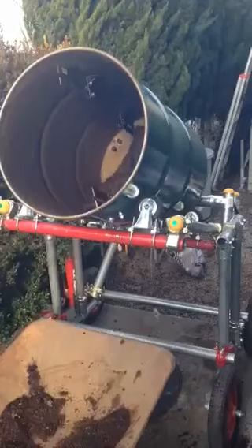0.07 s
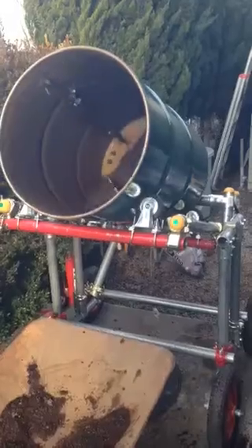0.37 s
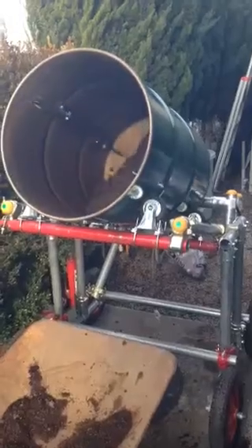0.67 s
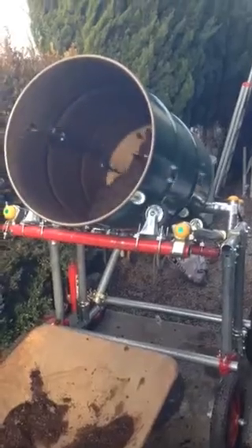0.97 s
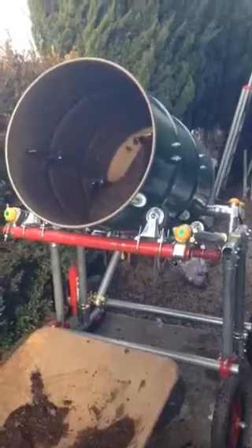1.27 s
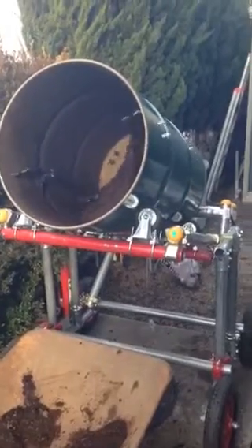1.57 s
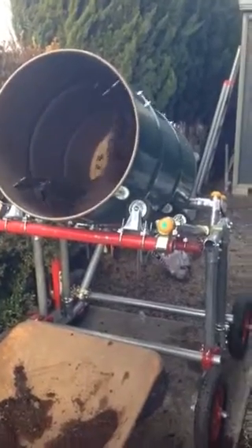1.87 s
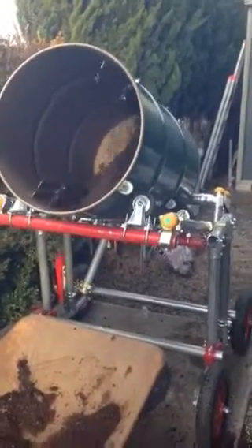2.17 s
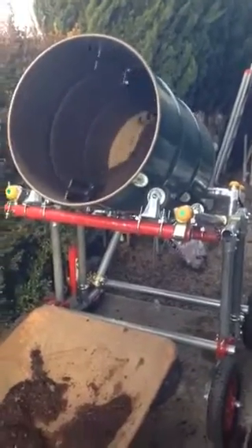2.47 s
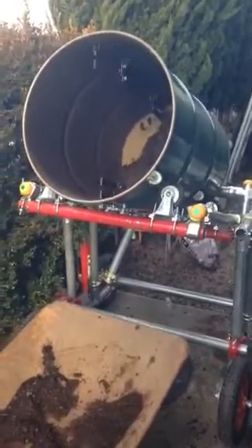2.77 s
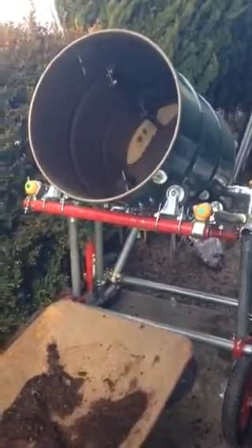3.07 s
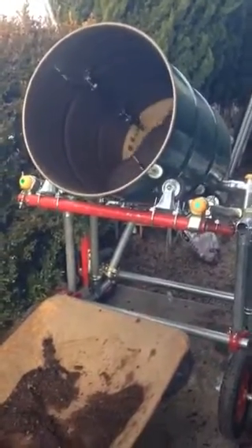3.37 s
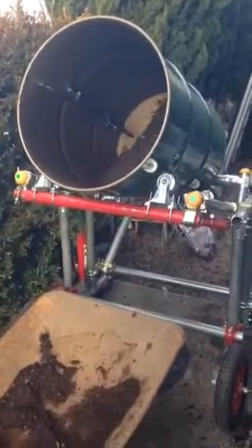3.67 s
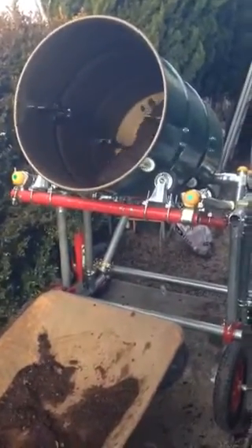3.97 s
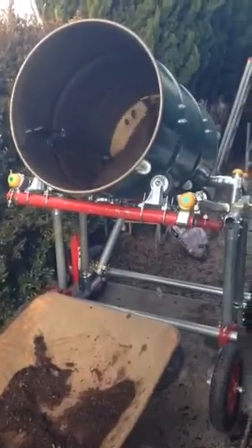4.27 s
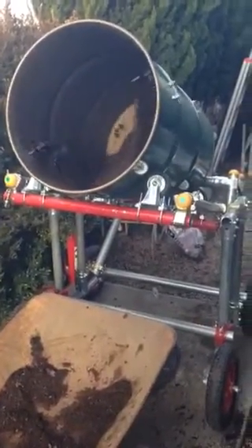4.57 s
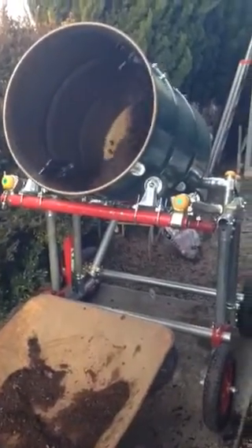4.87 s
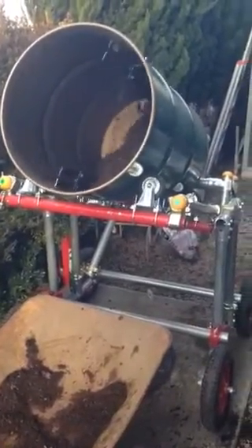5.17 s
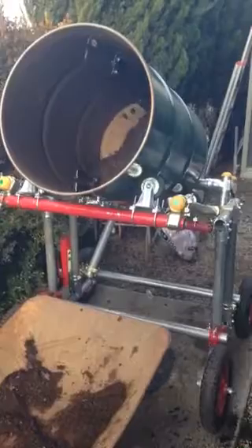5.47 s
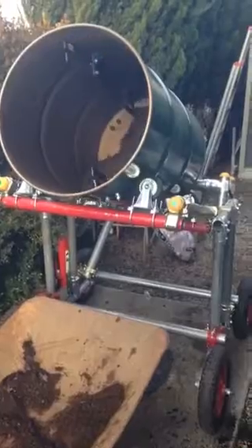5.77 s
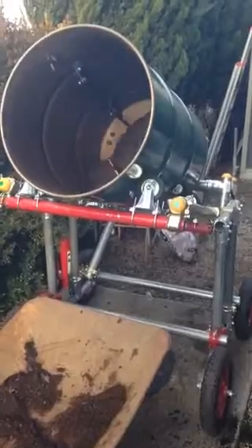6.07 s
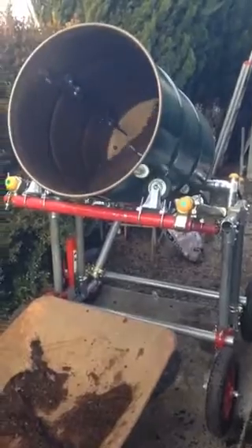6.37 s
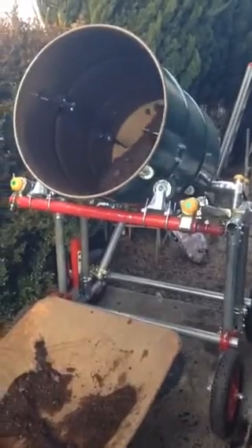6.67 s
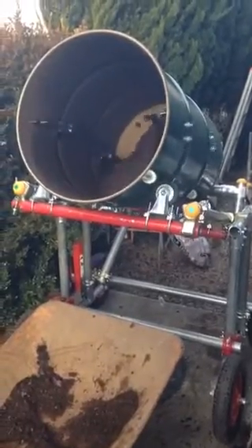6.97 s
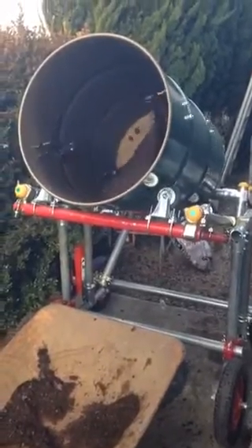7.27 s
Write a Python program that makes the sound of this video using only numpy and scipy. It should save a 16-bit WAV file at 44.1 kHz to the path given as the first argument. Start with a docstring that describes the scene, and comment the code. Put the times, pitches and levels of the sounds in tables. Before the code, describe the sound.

Compost trickles and spills inside a turning steel drum, with small stones clacking over a humming motor and a fast-knocking drive.

```python
"""Compost tumbling in a steel drum

A home-made mixer turns a drum on rollers, outdoors and close by. The rollers rumble, the motor hums,
and the drive knocks about 21 times a second, exciting the damped modes of the frame. Inside, compost
trickles, slides and spills from the paddles: countless tiny impacts, coloured by the steel's resonances.
Soft clods thud, stones clack and grit squeaks, all with the short reverberation of the drum."""
import sys
import numpy as np
from scipy import signal
from scipy.fft import rfft, irfft
from scipy.io import wavfile

SR = 44100
rng = np.random.default_rng(int(sys.argv[2]) if len(sys.argv) > 2 else 0)


def inscribe(sig):
    """Save sig as 16-bit PCM at rate SR to the path in sys.argv[1].

    A 1-D sig is mono; a 2-D sig holds one channel per row.
    Samples are clipped to [-1, 1] before scaling.
    """
    pcm = np.round(np.clip(np.atleast_2d(sig).T, -1, 1) * 32767)
    wavfile.write(sys.argv[1], SR, pcm.astype(np.int16))


N = 331632
TIME = np.arange(N) / SR

# resonances of the steel drum: (frequency [Hz], bandwidth [Hz], boost [dB])
STEEL_RESONANCES = [(627, 63, 2.5), (1960, 28, 6), (2190, 51, 3.5), (2500, 80, 5), (2930, 230, 3.5),
                    (3342, 56, 8), (3840, 190, 4), (4345, 130, 4.5), (6800, 90, 2), (8600, 80, -1)]
# impact spectra of crumbs and of fine dust: (frequency [Hz], relative level [dB])
CRUMB_SPECTRUM = [(150, -38), (450, -10), (800, -7.5), (1200, -12), (1700, -3), (2400, -0.5), (3100, 0.5),
                  (4000, -4), (5500, -9), (8000, -19.5), (15000, -45)]
DUST_SPECTRUM = [(1000, -21.5), (3000, -28.5), (4500, -3), (6000, -.5), (7200, 0.5), (9000, -3.5),
                 (10500, -9.5), (12500, -18.5), (15000, -23)]


def amp(db):
    """Amplitude ratio of a level in decibels."""
    return 10 ** (np.asarray(db) / 20)


def unit_rms(x):
    """Normalisation to an rms of 1."""
    return x / np.sqrt(np.mean(x ** 2) + 1e-20)


def follow(rows):
    """Linear interpolation of (time [s], value) rows at every sample."""
    return np.interp(TIME, *np.transpose(rows))


def add(mix, start, sound):
    """Superposition: a sound joins the mix at start [s]."""
    part = mix[max(round(start * SR), 0):][:len(sound)]
    part += sound[:len(part)]


def wander(hz):
    """Low-pass Gaussian noise: a fluctuation of rms 1 at rates up to about hz."""
    freqs = np.fft.rfftfreq(N, 1 / SR)
    return unit_rms(irfft(rfft(rng.standard_normal(N)) * np.exp(-(freqs / hz) ** 2), N))


def colour(x, spectrum, peaks=(), size=8192):
    """Minimum-phase filtering at unit energy: a smooth spectrum with resonance peaks on top."""
    hz = abs(np.fft.fftfreq(size, 1 / SR))
    knot_hz, knot_db = np.transpose(spectrum)
    db = np.interp(np.log(hz + 1), np.log(knot_hz), knot_db)
    for centre, width, boost in peaks:
        db = db + boost / (1 + (2 * (hz - centre) / width) ** 2)
    response = np.exp(np.conj(signal.hilbert(np.log(amp(db)))))
    taps = np.fft.ifft(response).real[:size // 2]
    return signal.oaconvolve(x, taps / np.linalg.norm(taps))[:len(x)]


def grains(per_s, spread_db, count):
    """Shot noise of rms 1: impacts at random moments, many small and a few large."""
    chance, quantile, sign = rng.random((3, count))
    size = np.minimum(-np.log(1 - quantile), 4)
    return unit_rms((chance < per_s / SR) * amp(spread_db * size) * np.sign(sign - .5))


def decay(t, rise, t60):
    """Exponential damping: a quick rise, then a fall of 60 dB per t60 [s]."""
    return (1 - np.exp(-t / rise)) * np.exp(-np.log(1000) * t / t60)


def ringing(modes, rise):
    """Free vibration after a blow: each mode is a damped sine."""
    t = TIME[:SR // 3]
    return sum(amp(db) * decay(t, rise, t60) * np.sin(2 * np.pi * hz * t) for hz, db, t60 in modes)


def drum_reverberation(x, t60, wet_db, count=300):
    """Diffuse reflection: grains land at ever new spots, so each short piece has its own echoes."""
    t, hop = TIME[:SR // 10], N // count + 1
    padded = np.pad(x, (hop, 2 * hop))
    pieces = np.lib.stride_tricks.sliding_window_view(padded, 2 * hop)[::hop]
    pieces = pieces * signal.windows.cosine(2 * hop)
    taps = rng.standard_normal((len(pieces), len(t))) * amp(-60 * t / t60)
    taps /= np.linalg.norm(taps, axis=1, keepdims=True)
    echo = np.zeros(len(padded))
    for k, piece in enumerate(signal.fftconvolve(pieces, taps, axes=1)):
        add(echo, k * hop / SR, piece)
    return (x + amp(wet_db) * echo[hop:hop + N]) / np.hypot(1, amp(wet_db))


def rollers():
    """Rolling noise: the drum rumbles over the broadband running of wheels and bearings."""
    # strength of the rumble: (time [s], relative level [dB])
    rumble_levels = [(0.2, -62.1), (0.55, -60.5), (1.1, -63.1), (1.35, -59.5), (1.7, -63.0), (2.15, -62.5),
                     (2.9, -61.5), (3.6, -64), (3.9, -61.5), (4.38, -59), (5.0, -65), (5.45, -65),
                     (6.2, -66.5), (6.6, -65), (7.3, -66)]
    # spectra of the rolling drum and of the bearings: (frequency [Hz], relative level [dB])
    rumble_spectrum = [(15, -39), (28, -14), (45, -9.5), (59, 6), (68, -7), (77, 1.5), (105, -13.5),
                       (200, -13.5), (600, -71)]
    running_spectrum = [(30, -9), (110, 3.5), (160, -15), (200, 9), (290, 6.5), (360, -4.5), (550, -1.5),
                        (1100, -3), (2800, -9), (5000, -12), (9000, -16.5), (15000, -20.5)]
    rumble = colour(rng.standard_normal(N), rumble_spectrum) * amp(follow(rumble_levels) + 1.5)
    running = rng.standard_normal(N) * amp(1.76 * wander(hz=24.7))
    return rumble + amp(-56) * colour(running, running_spectrum, STEEL_RESONANCES)


def motor():
    """Phase-modulated tones: magnetic hum and thin gear whine, over the drone of the drive."""
    # hum and whine: (frequency [Hz], rms level [dB], rms phase waver [cycles])
    partials = [(100.4, -65, .015), (150.1, -107, .03), (608, -77, 0.026), (1610, -76, 0.32),
                (3235, -74, 0.54)]
    # the drone grows as the paddles lift the load: (time [s], rms level [dB])
    drone_levels = [(0, -69), (2.4, -80), (3.5, -69), (4.3, -63), (4.9, -60), (5.4, -60.5), (6, -64),
                    (7.5, -77)]
    tones, drone_hz = np.zeros(N), 90.2
    for hz, db, waver in partials:
        gain = amp(db + 2 * wander(hz=1))
        tones += gain * np.sin(2 * np.pi * (hz * TIME + waver * wander(hz=1.55)))
    drone = np.sin(2 * np.pi * (drone_hz * TIME + 0.076 * wander(hz=5.6)))
    return np.sqrt(2) * (tones + amp(follow(drone_levels)) * drone)


def drive():
    """Impulse-train excitation: the drive knocks the frame, every second knock harder on average."""
    # speed of the drive: (time [s], knock rate [1/s])
    knock_rates = [(0, 20.7), (2, 20.85), (3.2, 20.85), (4.3, 21.08), (5.5, 20.9), (6.3, 20.79),
                   (7.5, 20.82)]
    # strength of the knocks: (time [s], relative level [dB])
    knock_levels = [(0.25, -58), (0.75, -59.5), (1.0, -55), (1.65, -60.5), (2.15, -58.5), (2.6, -55.2),
                    (3.2, -59), (4.05, -57.5), (4.33, -53), (4.5, -63), (4.7, -53.5), (4.92, -57.8),
                    (5.3, -54.4), (6.2, -55), (7.35, -59.6)]
    # modes of the frame: (frequency [Hz], relative level [dB], t60 [s])
    frame_modes = [(87, -23, 0.11), (217, -18, 0.19), (234.8, 13, 0.098), (280, -4.5, 0.035)]
    jitter_s, scatter_db, limp_db = 0.00035, 2.74, 3
    knock_count = np.cumsum(follow(knock_rates)) / SR - .24
    times = TIME[1:][np.diff(np.floor(knock_count)) > 0]
    blows = np.zeros(N)
    for k, start in enumerate(times):
        late, force = rng.standard_normal(2)
        add(blows, start + jitter_s * late, [amp(scatter_db * force + limp_db * (k % 2 - .5))])
    knocks = signal.oaconvolve(blows, ringing(frame_modes, rise=0.0052))[:N]
    return unit_rms(knocks) * amp(follow(knock_levels) - 1)


def squeaks():
    """Friction tones: grit dragged over the steel sings briefly with a raspy, unsteady pitch."""
    # squeaks of grit: (time [s], duration [s], start pitch [Hz], end pitch [Hz], level [dB])
    glides = [(3.925, 0.05, 4550, 4380, -54), (3.958, 0.053, 1845, 1740, -54),
              (4.195, 0.14, 2940, 2950, -50.5), (5.472, 0.044, 6340, 6000, -49.5),
              (5.549, 0.047, 6250, 5330, -48)]
    out, tremble = np.zeros(N), .05 * wander(hz=900)
    for start, length, from_hz, to_hz, db in glides:
        count = round(length * SR)
        hz = np.linspace(from_hz, to_hz, count) * (1 + tremble[round(start * SR):][:count])
        add(out, start, amp(db) * np.hanning(count) * np.sin(2 * np.pi * np.cumsum(hz) / SR))
    return out


def stones():
    """Hard impact: a small stone excites a cluster of the wall's modes."""
    # stone strikes: (time [s], relative level [dB], pitch of the spot [Hz], t60 [s])
    strikes = [(.434, -42, 1950, .07), (1.591, -47, 2124, .076), (2.765, -43, 2700, .05),
               (2.912, -31.5, 2544, 0.055), (3.579, -45, 3390, .09), (3.88, -39, 2010, 0.055),
               (6.342, -40, 2630, 0.045)]
    # modes of a struck spot: (ratio to its pitch, relative level [dB])
    spot_modes = [(.88, -3), (.965, -1), (1.028, 0.5), (1.16, -9), (1.3, -18), (3.6, -7.5)]
    out = np.zeros(N)
    for start, db, hz, t60 in strikes:
        modes = [(hz * ratio, db + mode_db - 1.5, t60) for ratio, mode_db in spot_modes]
        add(out, start, ringing(modes, rise=0.0022))
    return out


def clods():
    """Inelastic impact: damp lumps break up with a hollow thud and set the drum booming."""
    # landings: (time [s], relative level [dB], pitch [Hz], relative boom level [dB], crush t60 [s])
    landings = [(.336, -38.5, 810, -58, 0.1), (0.941, -43.5, 446, -47, .17), (.999, -47.5, 700, -51, 0.14),
                (1.365, -47.5, 565, -54, 0.21), (1.946, -47, 600, -56, 0.26), (2, -37, 620, -62, 0.11),
                (2.017, -43.5, 445, -64, 0.19), (3.019, -54, 395, -47, .08), (3.226, -47.5, 495, -58, 0.21),
                (3.617, -44, 394, -57, 0.15), (3.815, -45.5, 340, -47, 0.099), (3.99, -45.5, 686, -57, .12),
                (4.345, -47, 900, -61, .1), (4.795, -42, 694, -44, 0.093), (4.993, -48.5, 640, -48, .16),
                (6.19, -47, 1320, -51, 0.14), (6.785, -39, 608, -65, 0.15), (7.022, -41, 510, -57, .12)]
    # spectrum of a soft impact: (frequency [Hz], relative level [dB])
    thud_spectrum = [(80, -28), (200, -6), (370, -6), (470, 1), (800, -0.5), (1300, -5.5), (2100, -5),
                     (3000, -20), (8000, -39)]
    # low modes of the drum: (frequency [Hz], relative level [dB], t60 [s])
    boom_modes = [(177, -1.5, 0.073), (272, -0.5, 0.15), (314, 3, 0.13), (404, -14, 0.23)]
    out, t, boom = np.zeros(N), TIME[:SR // 3], ringing(boom_modes, rise=0.002)
    for start, db, hz, boom_db, t60 in landings:
        crush = grains(per_s=4600, spread_db=2, count=len(t)) * decay(t, rise=0.0013, t60=t60)
        thud = colour(crush, thud_spectrum, [(hz, 200, 5)])
        hollow = ringing([(hz, -9, t60 * 1.5)], rise=.004)
        add(out, start, amp(db - 3.5) * (thud + hollow) + amp(boom_db - 1.5) * boom)
    return out


def spilling():
    """Shot-noise bursts: a handful of crumbs excites the resonance of the spot where it lands."""
    # spills: (time [s], relative level [dB], relative dust level [dB], spot resonance [Hz])
    spills = [(.276, -34, -2, 3050), (.433, -30.5, -5.5, 1940), (.607, -37, -2, 2980), (.698, -39, 1, 4360),
              (1.251, -34.5, -20, 3390), (1.59, -39, 3.5, 2100), (1.748, -38.5, -2, 1960),
              (2.106, -36, -13, 2220), (2.371, -38, 1, 4300), (2.442, -33, -3, 3020),
              (2.595, -34.5, -3, 2820), (2.765, -30, -12, 2800), (2.79, -34, 7, 2470),
              (2.805, -32, 4.5, 3240), (2.912, -23.5, -5.5, 2580), (3.186, -42.5, 7, 3310),
              (3.218, -33, -1, 2200), (3.269, -40, 7, 2450), (3.337, -37, -22, 2960),
              (3.577, -31, -5, 3380), (3.624, -36, -8, 2640), (3.883, -35, -22, 2370),
              (4.033, -38, 3, 3800), (4.074, -37.5, 3, 2520), (4.604, -35, -1, 2940),
              (4.868, -41, -2, 3250), (5.828, -36, -4, 2650), (6.341, -30.5, -1.5, 2580),
              (7.165, -35, -5.5, 3300), (7.361, -34, -3, 2500), (7.502, -41, 2, 3000)]
    out, t = np.zeros(N), TIME[:SR // 4]
    for start, db, dust_db, hz in spills:
        envelope = amp(db - 8) * decay(t, rise=0.0011, t60=0.061)
        peaks = STEEL_RESONANCES + [(hz, 300, 6), (2600, 1800, 4)]
        crumbs = colour(envelope * grains(per_s=23000, spread_db=1, count=len(t)), CRUMB_SPECTRUM, peaks)
        dust = colour(envelope * grains(per_s=9200, spread_db=3.5, count=len(t)), DUST_SPECTRUM)
        add(out, start - .001, crumbs + amp(dust_db + 1.5) * dust)
    return out


def trickle_envelope():
    """Periodic modulation: the thin stream dwindles once a turn, as the paddles lift the load clear."""
    turn_s, dip_at_s, dip_width_s = 2.95, 0.16, 0.1
    level_db, dip_db = -58, -8.5
    from_dip_s = (TIME - dip_at_s + turn_s / 2) % turn_s - turn_s / 2
    return amp(level_db + dip_db * np.exp(-(from_dip_s / dip_width_s) ** 2))


def slide_envelopes():
    """Incoherent addition: slides of crumbs and dust swell, hold and fade, and their powers add."""
    # heaps sliding down the wall: (time [s], duration [s], level [dB], dust re crumbs [dB])
    slides = [(0.104, 0.051, -57, -4), (0.258, 0.069, -51.5, -2), (0.439, .07, -52, -5.5),
              (0.58, 0.19, -58.5, -1), (0.82, .05, -49.5, -2), (0.917, 0.12, -52, -2),
              (1.111, 0.23, -50.5, -4.5), (1.354, 0.095, -50, -5.5), (1.475, 0.12, -57, -6),
              (1.772, .15, -57, -4), (2.09, 0.068, -51.5, -1.5), (2.161, 0.14, -53, -8.5),
              (2.474, 0.098, -51.5, -2.5), (2.772, 0.037, -46, -1), (2.85, 0.18, -55, -5.5),
              (3.185, 0.093, -47, -4), (3.569, 0.074, -46, -3.5), (3.703, 0.11, -68, -1),
              (3.967, .2, -53, -1.5), (4.264, 0.035, -52.5, -1.5), (4.363, 0.26, -51.5, -1.5),
              (4.654, 0.17, -58.5, 0.5), (4.851, .16, -53.5, 0), (5.106, 0.31, -52.5, -1),
              (5.45, .11, -57.5, -3), (5.645, 0.066, -52, -4), (5.812, 0.052, -50.5, 0),
              (6.144, 0.053, -48.5, -4.5), (6.244, .12, -51, 0.5), (6.392, 0.11, -54.5, -3.5),
              (6.522, .1, -58.5, -5), (6.74, 0.15, -53, -3.5), (6.874, 0.13, -50, -6),
              (7.153, 0.11, -57, -5.5), (7.309, 0.081, -53.5, -1)]
    rise_s, fade_s = 0.029, 0.038
    crumb_power, dust_power, t = np.zeros(N), np.zeros(N), TIME[:SR]
    for start, length, db, dust_db in slides:
        envelope = np.minimum(t / rise_s, 1) * np.exp(-np.maximum(t - length, 0) / fade_s)
        add(crumb_power, start, (amp(db) * envelope) ** 2)
        add(dust_power, start, (amp(db + dust_db) * envelope) ** 2)
    return np.sqrt(crumb_power), np.sqrt(dust_power)


def sliding():
    """Granular flow: crumbs and dust run down the resonant wall in small clumps."""
    trickle, clumps = trickle_envelope(), amp(1.93 * wander(hz=47.6))
    crumb_slides, dust_slides = slide_envelopes()
    crumb_flow = clumps * np.hypot(trickle, crumb_slides)
    dust_flow = clumps * np.hypot(trickle * amp(-3), dust_slides)
    crumbs = grains(per_s=6000, spread_db=2, count=N) * crumb_flow
    dust = grains(per_s=10000, spread_db=4.5, count=N) * dust_flow
    return colour(crumbs, CRUMB_SPECTRUM, STEEL_RESONANCES) + colour(dust, DUST_SPECTRUM, STEEL_RESONANCES)


def scene():
    """Superposition of the compost in the drum and the machine that turns it, alike in both channels."""
    compost = sliding() + spilling() + stones() + clods() + squeaks()
    mono = drum_reverberation(compost, t60=0.05, wet_db=-6) + drive() + motor() + rollers()
    return np.array([mono, mono])


def record(dry):
    """Gating and band limiting: a moment of silence, then the sound without its highest treble."""
    silence_s, cutoff_hz = .12, 15350
    lowpass = signal.firwin(511, cutoff_hz, window=("kaiser", 9), fs=SR)
    return signal.oaconvolve(dry * (TIME >= silence_s), lowpass[None], "same")


dry = scene()
out = record(dry)
inscribe(out)
```